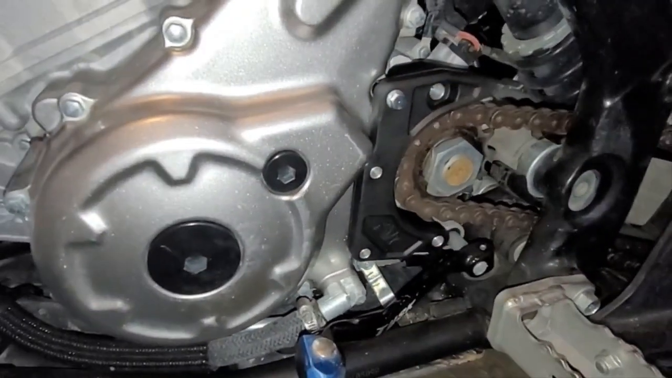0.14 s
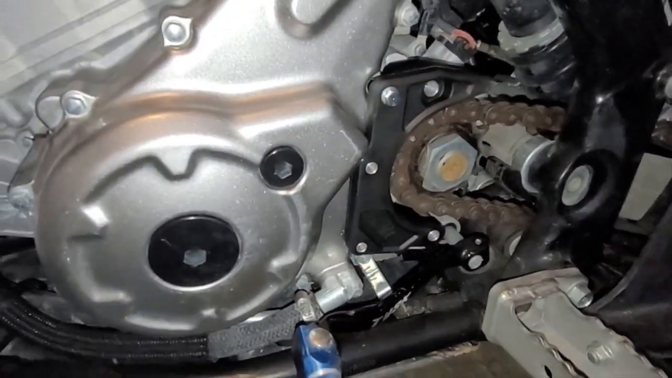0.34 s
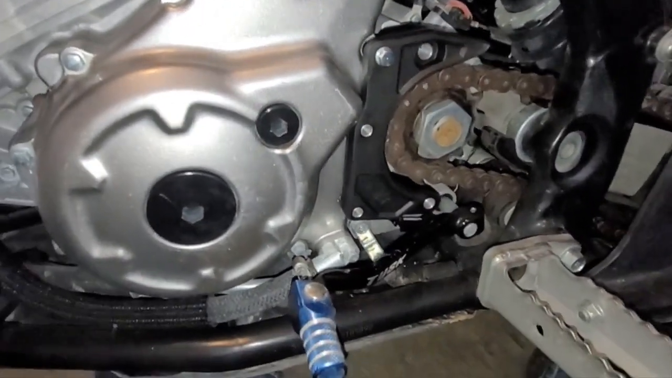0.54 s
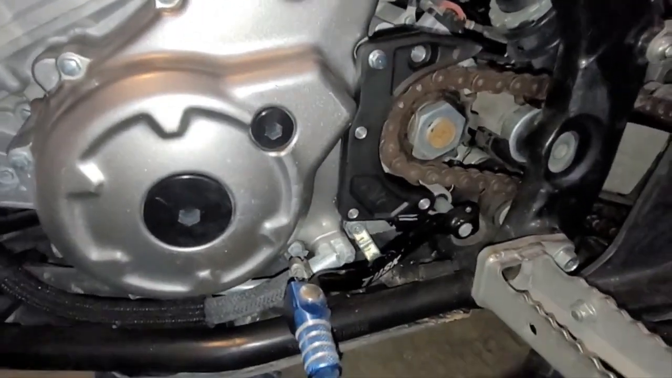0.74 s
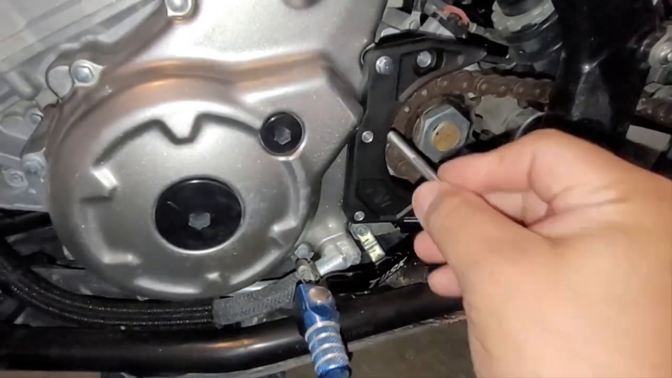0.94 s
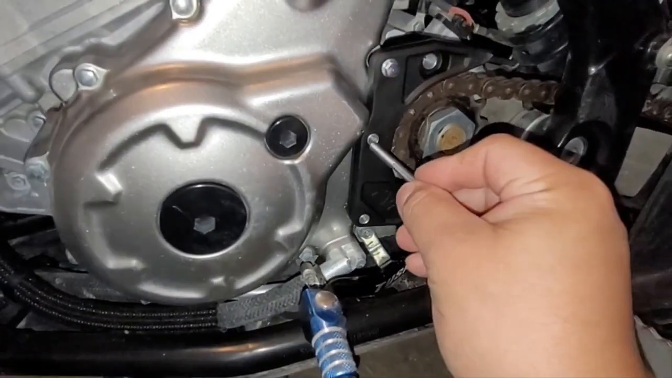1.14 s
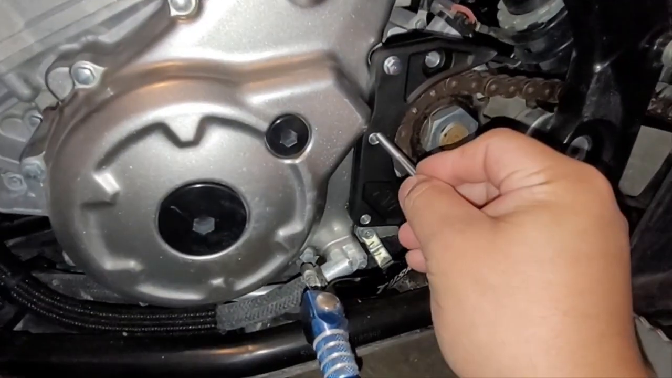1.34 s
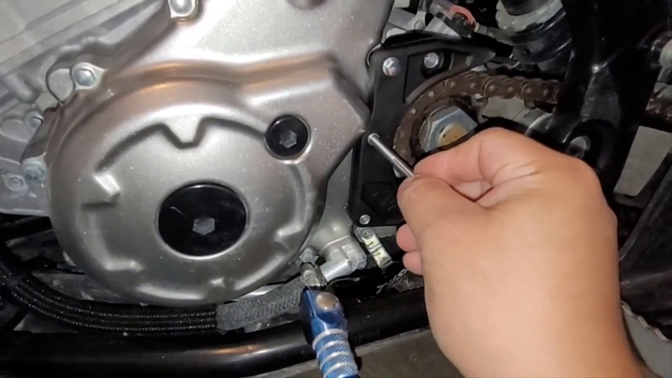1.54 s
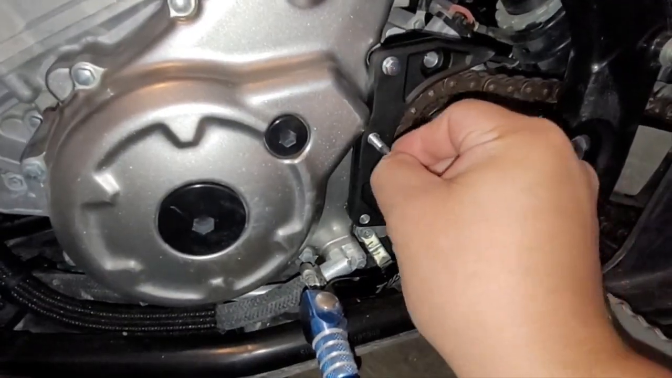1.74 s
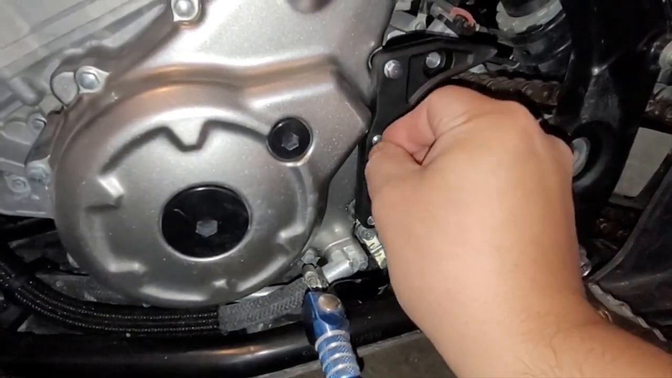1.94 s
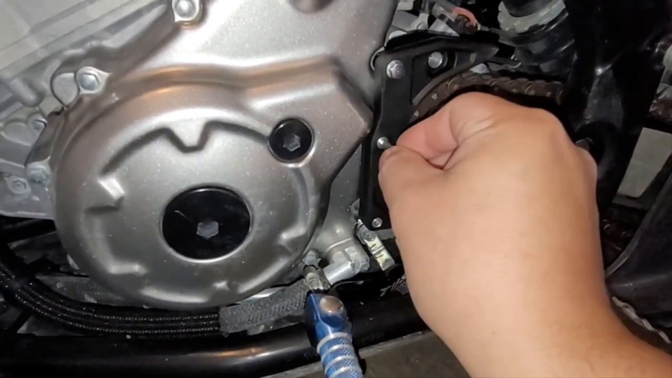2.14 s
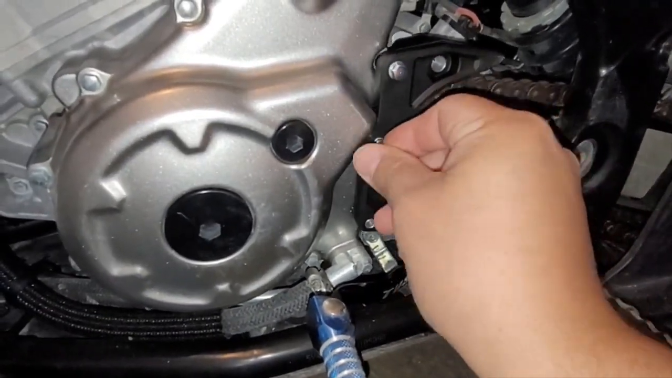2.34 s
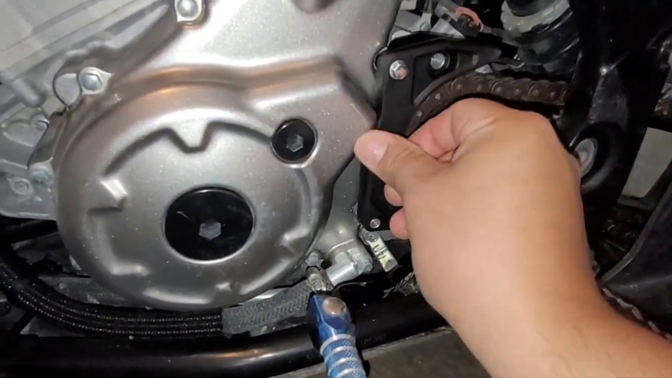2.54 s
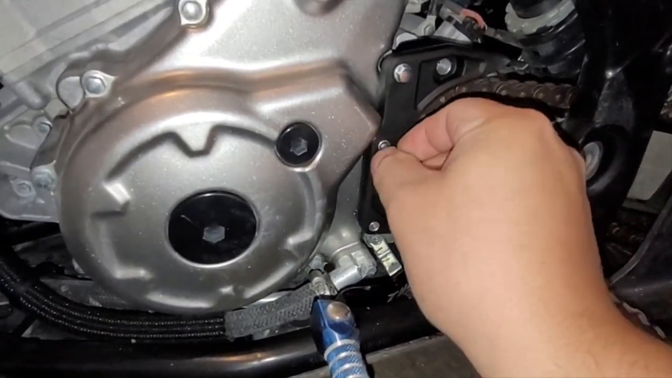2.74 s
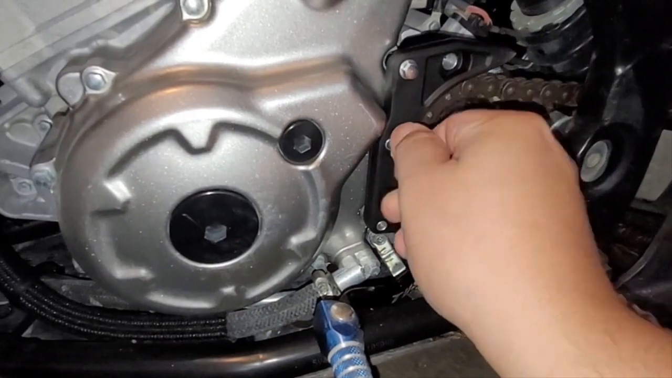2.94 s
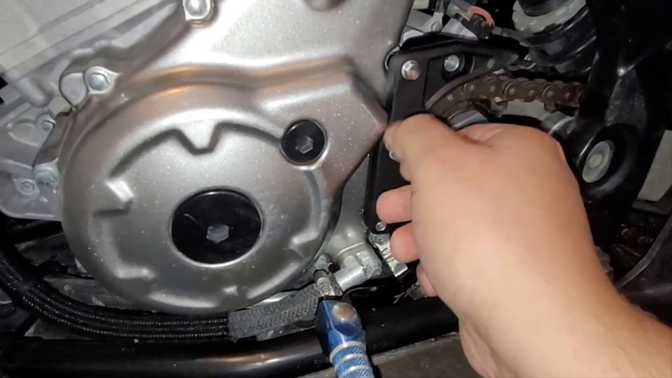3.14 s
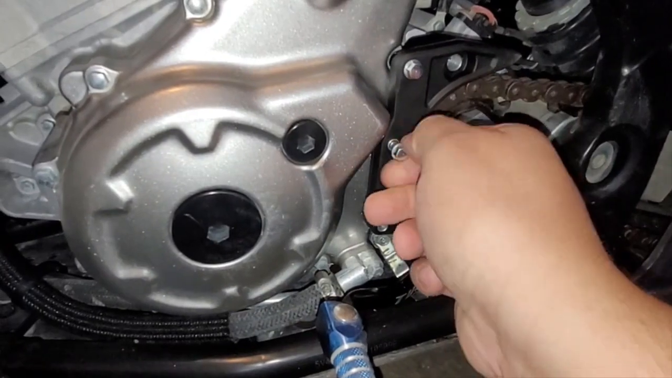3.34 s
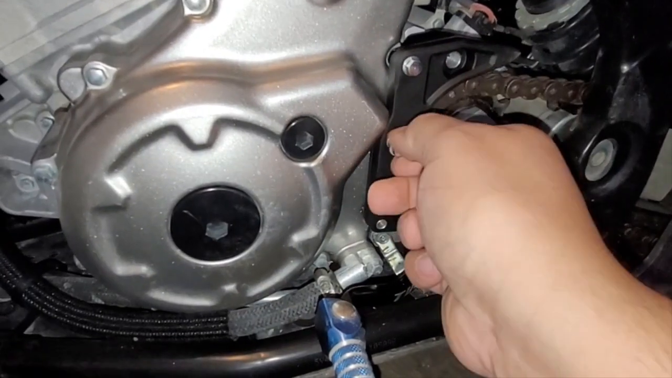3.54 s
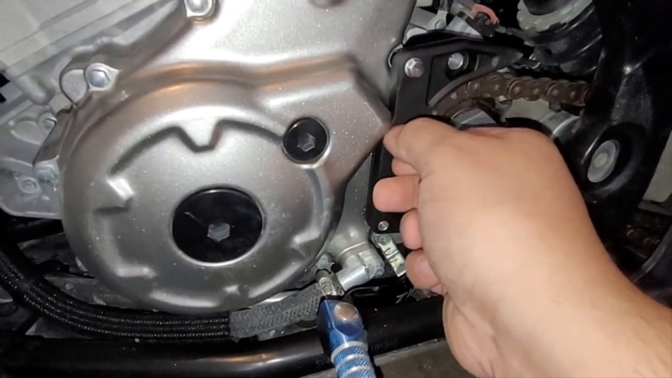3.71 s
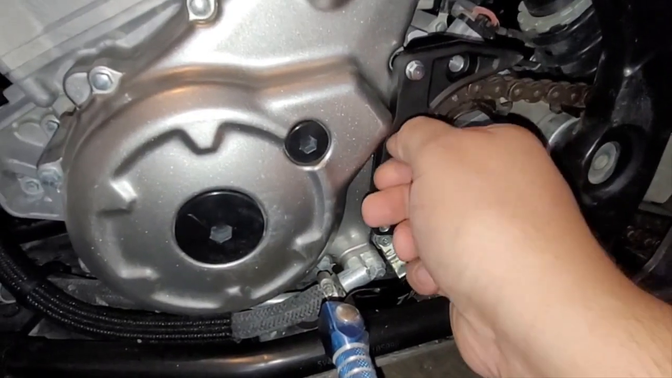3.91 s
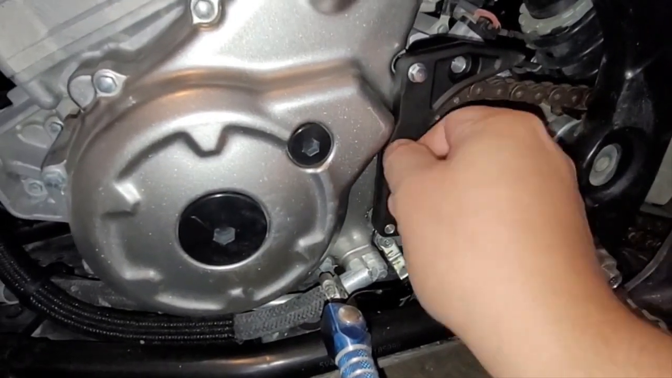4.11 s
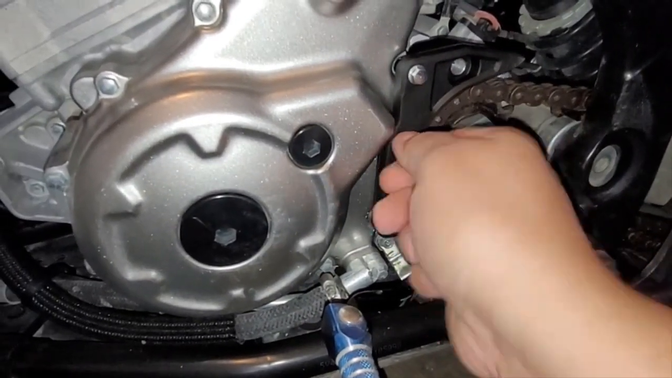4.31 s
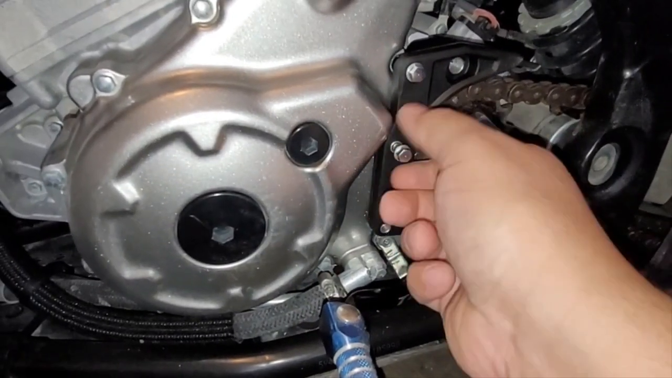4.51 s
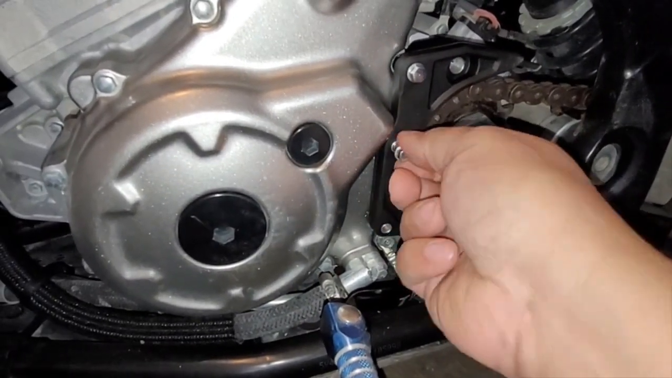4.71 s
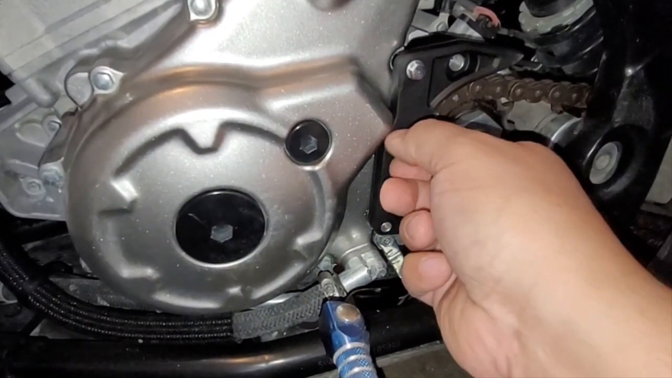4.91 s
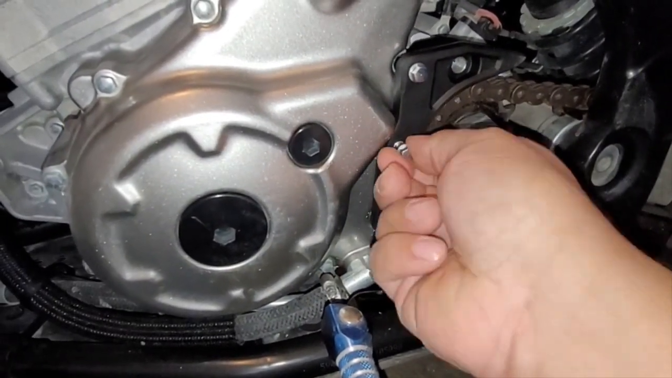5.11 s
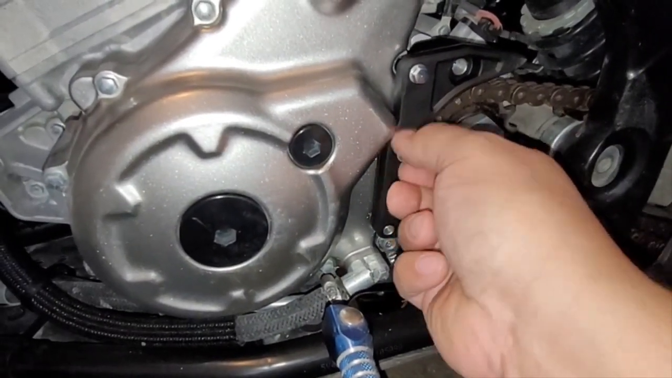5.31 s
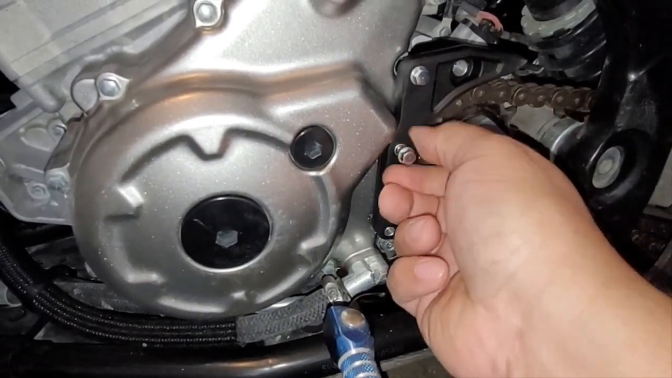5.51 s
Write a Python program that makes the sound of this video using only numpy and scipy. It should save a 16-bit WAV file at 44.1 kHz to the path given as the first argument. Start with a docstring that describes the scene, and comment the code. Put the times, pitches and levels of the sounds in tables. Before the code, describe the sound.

A small bolt rings briefly, knocks and chatters into a metal hole, then fades to sparse faint ticks over low machine rumble.

```python
"""In a quiet, rumbling workshop a steel bolt is picked up with a thin ping, fed through a guard on a
motorcycle engine and started by hand. Contact forces excite resonant modes of guard and bolt as knocks and
clacks, with high-passed edge ticks. Sliding threads are uneven grains in coloured noise, with catches that
click; fingertips thump as band-passed noise. Decaying noise echoes stand for engine, floor and room."""
import sys
import numpy as np
from scipy import signal
from scipy.fft import rfft, irfft, next_fast_len
from scipy.io import wavfile

SR = 44100
rng = np.random.default_rng(int(sys.argv[2]) if len(sys.argv) > 2 else 0)


def store_pcm(level_fs):
    """Save levels as 16-bit WAV."""
    pcm = np.round(np.clip(level_fs, -1, 1) * 32767).astype(np.int16)
    wavfile.write(sys.argv[1], SR, np.atleast_2d(pcm).T)


N = 245195
TIME = np.arange(N) / SR
# a click's buffer opens this long before its hard touch; span over which click energy is averaged
APPROACH_S, CONTACT_S = .008, .006
# strokes of threads and fingers: (start [s], end [s], peak level of the rub [dB])
STROKES = [(-.1, 0.452, -66.5), (0.557, 0.674, -68), (1.486, 1.587, -56), (1.738, 1.94, -51),
           (1.957, 2.075, -38.5), (2.387, 2.444, -38), (2.518, 2.622, -41), (2.999, 3.091, -54),
           (3.375, 3.434, -62.5), (4.072, 4.183, -59.5), (4.346, 4.576, -61), (5.101, 5.165, -57.5),
           (5.167, 5.388, -70), (5.419, 5.473, -52.5), (5.509, 5.609, -55)]


def from_db(db):
    """Logarithmic level: 20 dB is a factor of ten in amplitude."""
    return 10 ** (np.asarray(db) / 20)


def rms_one(x):
    """Power normalisation: scale to unit mean square."""
    return x / np.sqrt(np.mean(x ** 2) + 1e-20)


def at_hz(points, hz):
    """Logarithmic pitch: interpolate a table along log frequency."""
    points = np.array(points)
    return np.interp(np.log(hz), np.log(points[:, 0]), points[:, 1])


def cut(x, hz, kind, order=2):
    """Causal filtering: a maximally flat Butterworth response."""
    sos = signal.butter(order, np.clip(hz, 10, .47 * SR), kind, fs=SR, output="sos")
    return signal.sosfilt(sos, x)


def panned(pan_db):
    """Level-difference stereo: left over right in dB, at unit mean power."""
    return rms_one(from_db([[pan_db / 2], [-pan_db / 2]]))


def add(out, s, sound):
    """Superposition: mix a short sound in at time s, or at zero if s is negative."""
    start = max(round(s * SR), 0)
    out[:, start:start + sound.shape[1]] += sound[:, :N - start]


def stereo_noise(size, alike):
    """Partial coherence: white noise whose shared power fraction is alike."""
    alike = np.clip(alike, 0, 1)
    white = rng.standard_normal((3, size))
    return np.sqrt(alike) * white[0] + np.sqrt(1 - alike) * white[1:]


def bands(x):
    """Band analysis: split into half octaves, as (centre Hz, signal)."""
    edges = 22 * 2 ** np.arange(0, 9.8, .5)
    return [(np.sqrt(low * high), cut(x, [low, high], "band", order=3))
            for low, high in zip(edges, edges[1:])]


def coloured(x, spectrum):
    """Spectral shaping: weight noise by a smooth spectrum, then set unit power."""
    size = next_fast_len(N)
    hz = np.arange(size // 2 + 1) * SR / size + 1  # +1 keeps the logarithm finite
    shaped = rfft(x, size) * from_db(at_hz(spectrum, hz))
    return rms_one(irfft(shaped, size)[:, :N])


def background(air_db):
    """Stationary noise: low machine rumble, nearly alike on both sides, under a faint wide hiss."""
    # workshop rumble: (frequency [Hz], relative density [dB per Hz])
    rumble_colour = [(20, -26.5), (38, -25), (56, 1), (78, -5.5), (95, 7), (130, -10), (185, -11),
                     (260, -31), (500, -69)]
    # (time [s], level [dB])
    rumble_level = [(0.0, -47.5), (1.2, -45.5), (2.2, -52), (5.56, -56.5)]
    # still air: (frequency [Hz], relative density [dB per Hz])
    air_colour = [(300, 2), (1800, -8.5), (3000, -10), (6400, -13.5), (7800, -36), (15000, -23)]
    level = from_db(np.interp(TIME, *np.transpose(rumble_level)))
    rumble = level * coloured(stereo_noise(N, alike=0.95), rumble_colour)
    air = from_db(air_db) * coloured(stereo_noise(N, alike=0.033), air_colour)
    return rumble * panned(-0.89) + air


def slides(grains_per_s, grain_db, smooth_db):
    """Stick-slip friction: threads shed tiny uneven slips over a soft rub, swelling in each stroke."""
    # sliding steel: (frequency [Hz], relative density [dB per Hz])
    slide_colour = [(120, -25.5), (330, -2.5), (900, -4), (1700, 4), (4200, -8), (6300, -13.5),
                    (8000, -42.5), (15000, -30)]
    stroke = np.zeros(N)
    for start, end, db in STROKES:
        progress = np.clip((TIME - start) / (end - start), 0, 1)
        stroke += from_db(db) * np.sqrt(np.sin(np.pi * progress).clip(0))
    unevenness = np.minimum(rng.exponential(1, N), 4)
    slips = (rng.random(N) < grains_per_s / SR) * from_db(grain_db * unevenness)
    rub = stereo_noise(N, alike=1.0) * (rms_one(slips) + from_db(smooth_db))
    return stroke * coloured(rub, slide_colour) * panned(5)


def force(t, chatter_db, chatter_s, graze_s, alike):
    """Impact force: steel grazes, seats with a unit impulse at t = 0, and chatters to rest as noise."""
    swell = np.exp(-np.abs(t) / np.where(t < 0, graze_s, chatter_s))
    push = from_db(chatter_db) * stereo_noise(len(t), alike) * swell
    push[:, np.argmin(np.abs(t))] += 1
    return push


def resonate(push, modes, scatter_db, detune, side_db):
    """Modal superposition: grip and contact point vary the strength and pitch of each mode."""
    out = np.zeros_like(push)
    for k, (hz, width, db) in enumerate(modes):
        r = np.exp(-np.pi * width / SR)  # pole radius: a wider mode decays faster
        w = 2 * np.pi * hz * (1 + detune * rng.normal()) / SR
        gain = from_db(db + scatter_db * rng.normal() + side_db * rng.normal(size=(2, 1)))
        mode = signal.lfilter([1 - r, 0, r - 1], [1, -2 * r * np.cos(w), r * r], push)
        out += (-1) ** k * gain * mode
    return out


def at_level(sound, db):
    """Energy level: the click's early energy, spread over the contact time, gives its rms level."""
    energy = np.sum(sound[:, :round((APPROACH_S + CONTACT_S) * SR)] ** 2) / 2
    return sound * from_db(db) / np.sqrt(energy / (CONTACT_S * SR) + 1e-20)


def edge_tick(t, db):
    """Broadband impact: sharp steel edges snap in the high treble."""
    snap = force(t, chatter_db=-9, chatter_s=0.0048, graze_s=.0013, alike=0.18)
    return at_level(cut(snap, 4300, "high"), db)


def delayed_right(sound, lag_s):
    """Arrival-time difference: a close sound reaches the right side a little later."""
    index = np.arange(sound.shape[1])
    right = np.interp(index - lag_s * SR, index, sound[1], left=0, right=0)
    return np.array([sound[0], right])


def touch(s, knock_db, clack_db):
    """Modal excitation: one touch knocks the guard and clacks the bolt, its colour varying with time."""
    # guard and case: (frequency [Hz], bandwidth [Hz], relative gain [dB])
    guard_modes = [(287, 120, -27), (476.6, 27, -25), (758, 110, -17.5), (928, 55, -13), (1368, 160, -5),
                   (1653.4, 314, 1), (1764, 189, 6), (2115, 420, -19.5)]
    # bolt damped by fingers and hole: (frequency [Hz], bandwidth [Hz], gain before favouring [dB])
    bolt_modes = [(2280, 550, -1.5), (2630, 380, -1), (3104, 406, -4.5), (3540, 360, 2), (3638, 497, 1),
                  (4935, 1400, -6.5), (4960, 1200, -11), (5980, 540, -2), (6425, 880, -3.5)]
    # edge tick against the clack, highest while the bolt is loose in the hole: (time [s], level [dB])
    tick_sharpness = [(1.815, -43), (1.84, -23), (2.3, -27), (2.9, -24.5), (3.11, -10), (4.1, -33.5),
                      (4.56, -41), (5.12, -46.5), (5.45, -28)]
    # centre of the favoured bolt modes: (time [s], frequency [Hz])
    clack_centre = [(1.35, 3080), (1.53, 4200), (1.78, 3100), (1.85, 4530), (1.96, 3150), (2.17, 3860),
                    (2.42, 3060), (2.57, 3400), (4.15, 2770), (5.45, 2530)]
    t = TIME[:SR // 16] - APPROACH_S
    clack_hz = np.interp(s, *np.transpose(clack_centre))
    tick_db = clack_db + np.interp(s, *np.transpose(tick_sharpness))
    # the heavy guard answers mainly the one hard touch
    blow = force(t, chatter_db=-26, chatter_s=0.003, graze_s=.0013, alike=0.6)
    knock = resonate(blow, guard_modes, scatter_db=1.5, detune=.012, side_db=1.0)
    knock = at_level(cut(knock, 4400, "low"), knock_db)
    push = force(t, chatter_db=-16.5, chatter_s=0.0015, graze_s=.0013, alike=0.85)
    # modes near the centre of the clack are driven hardest
    favoured = []
    for hz, width, db in bolt_modes:
        octaves = np.log2(hz / clack_hz)
        favoured.append((hz, width, db + 11 * np.exp(-(octaves / 0.47) ** 2)))
    clack = resonate(push, favoured, scatter_db=1.0, detune=.02, side_db=1.5)
    # countless weak modes of the engine case add a little toneless crunch
    crunch = from_db(-9) * rms_one(cut(push, 5000, "low"))
    clack = cut(rms_one(clack) + crunch, 6660, "low", order=8)
    clack = at_level(cut(clack, 1900, "high", order=3), clack_db)
    clack = delayed_right(clack, .00055 * rng.uniform(0.46, 1))
    tick = edge_tick(t, tick_db)
    return knock * panned(pan_db=8.0) + clack * panned(pan_db=0.6) + tick * panned(pan_db=2.5)


def catches(count):
    """Intermittent sticking: threads catch at uneven moments, at levels scattered about the stroke's."""
    knock_offset_db, clack_offset_db, scatter_db = -3.5, 0.5, 4
    out = np.zeros((2, N))
    for start, end, db in STROKES:
        for k in range(count):
            s = start + (end - start) * (k + rng.random()) / count
            s = np.clip(s, 0, TIME[-1])
            level_db = db + scatter_db * rng.normal()
            add(out, s - APPROACH_S, touch(s, level_db + knock_offset_db, level_db + clack_offset_db))
    return out


def pings():
    """Free, then damped vibration: one bending mode with a faint sizzle dies in the fingers."""
    # (time [s], ring amplitude [dB], free time [s], tick level [dB], left over right [dB])
    ping_events = [(0.075, -42, 0.002, -59.5, 17), (.135, -51, 0.025, -90.5, 2.5),
                   (0.235, -42.5, 0.012, -61, 10), (0.2606, -30, 0.04, -45.5, 2.5)]
    ping_hz, damped_t60_s = 6625, 0.17
    out, t = np.zeros((2, N)), TIME[:SR // 2] - APPROACH_S
    for s, ring_db, free_s, tick_db, pan_db in ping_events:
        fade = from_db(ring_db - 60 * np.maximum(t - free_s, 0) / damped_t60_s) * (t > 0)
        sizzle = from_db(-36.5) * cut(stereo_noise(len(t), alike=0), 9290, "high")
        ring = fade * (np.sin(2 * np.pi * ping_hz * t) + sizzle)
        add(out, s - APPROACH_S, (ring + edge_tick(t, tick_db)) * panned(pan_db))
    return out


def contacts():
    """Repeated impact: the bolt feels for the hole, is fed in, rattles, seats and is turned by hand."""
    # bolt touches the hole: (time [s], guard knock level [dB], bolt clack level [dB])
    hole_touches = [ (1.347, -43.5, -38), (1.4004, -44, -42), (1.5113, -43, -43), (1.5311, -40, -44.5),
                    (1.5593, -44.5, -46), (1.7597, -33, -34.5), (1.817, -35, -32), (1.8389, -24.5, -22.5),
                    (1.8608, -27, -25), (1.8785, -28.5, -33), (1.92, -33, -30), (1.964, -33, -35.5),
                    (1.9711, -43, -28.5), (2.005, -32, -37), (2.0295, -29.5, -24.5), (2.1656, -20, -20),
                    (2.2799, -37, -35), (2.297, -25.5, -33), (2.3109, -34, -28), (2.4047, -32, -24),
                    (2.4175, -15.5, -28.5), (2.426, -26.5, -31), (2.502, -39, -37), (2.5194, -20.5, -24),
                    (2.527, -27.5, -31), (2.538, -31.5, -18.5), (2.5542, -35.5, -20), (2.569, -33, -11.5),
                    (2.5841, -29.5, -24), (2.5918, -32.5, -19), (2.6048, -44.5, -29), (2.683, -39.5, -52),
                    (2.7314, -37.5, -36), (2.7454, -39.5, -33), (2.7532, -33.5, -20), (2.8967, -30, -18),
                    (2.9026, -29, -51), (3.022, -37, -37), (3.0658, -40, -50), (3.1164, -41, -28.5),
                    (3.13, -38.5, -32.5), (3.9373, -55.5, -69.5), (4.0983, -47, -38.5),
                    (4.1086, -48.5, -38.5), (4.1527, -40.5, -35), (4.3658, -58.5, -53.5),
                    (4.4617, -48, -53.5), (4.4811, -51, -58), (4.5191, -44, -58), (4.5354, -60, -47.5),
                    (4.5552, -30.5, -34.5), (4.835, -32.5, -38.5), (5.122, -41.5, -44), (5.234, -49.5, -63),
                    (5.3112, -47, -63.5), (5.448, -42.5, -36.5), (5.5398, -51, -44.5)]
    out = np.zeros((2, N))
    for s, knock_db, clack_db in hole_touches:
        add(out, s - APPROACH_S, touch(s, knock_db, clack_db))
    return out


def bumps(swell_s):
    """Soft impact: compliant fingertips press on the guard and give dull, short thumps."""
    # (time [s], rms level at the crest of the swell [dB])
    finger_bumps = [(1.854, -44), (1.995, -56.5), (2.404, -45.5), (2.739, -47), (4.475, -49.5)]
    out, t = np.zeros((2, N)), TIME[:SR // 4]
    swell = t / swell_s * np.exp(1 - t / swell_s)
    for s, db in finger_bumps:
        thump = rms_one(cut(stereo_noise(len(t), alike=0.057), [250, 600], "band", order=3))
        add(out, s, from_db(db) * thump * swell)
    return out


def workshop(x, near_db, near_t60, room_db):
    """Reverberation by convolution: quick reflections off engine and floor, then a faint room tail."""
    # (frequency [Hz], 60 dB decay time [s])
    room_t60 = [(300, .5), (4000, .52), (14000, .42)]
    # tail: (frequency [Hz], relative level [dB])
    room_colour = [(200, 15.5), (1700, -1), (3300, -1), (6000, -2)]
    t = TIME[:SR]
    near = stereo_noise(len(t), alike=0.11) * from_db(-60 * t / near_t60) * (t > .0025)
    tail = np.zeros((2, len(t)))
    for hz, band in bands(stereo_noise(len(t), alike=0.15)):
        tail += band * from_db(at_hz(room_colour, hz) - 60 * t / at_hz(room_t60, hz))
    tail = tail * (1 - np.exp(-t / 0.0081))  # gradual build-up
    echo = from_db(near_db) * rms_one(near) + from_db(room_db) * rms_one(tail)
    echo = echo / np.sqrt(len(t))  # levels become echo energies against the direct sound
    return x + signal.fftconvolve(x, echo, axes=1)[:, :N]


def scene():
    """Superposed sources: bolt work at the engine, pings clear of it, and the background."""
    work = slides(grains_per_s=2000, grain_db=5.0, smooth_db=-3.5) + catches(count=3)
    work = work + contacts() + bumps(swell_s=0.0043)
    at_engine = workshop(work, near_db=-7.5, near_t60=0.059, room_db=-14.0)
    in_hand = workshop(pings(), near_db=-25.5, near_t60=0.05, room_db=-8.5)
    return at_engine + in_hand + background(air_db=-67.5)


def record(dry):
    """Saturation and band limiting: peaks round off towards 0.85, and a steep low-pass cuts the top."""
    rounded = dry / (1 + (dry / .85) ** 6) ** (1 / 6)
    low_pass = signal.ellip(10, .2, 70, 16000, fs=SR, output="sos")
    return signal.sosfilt(low_pass, rounded)


dry = scene()
out = record(dry)
store_pcm(out)
```